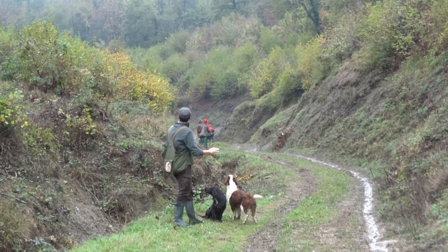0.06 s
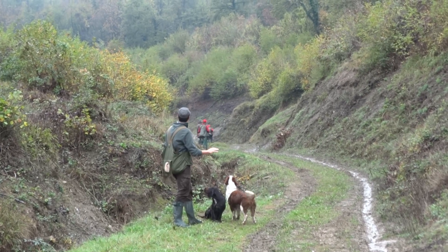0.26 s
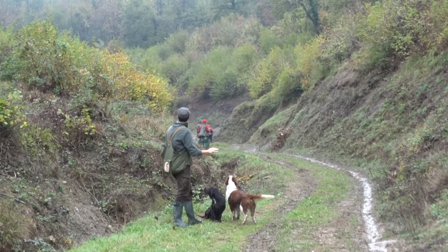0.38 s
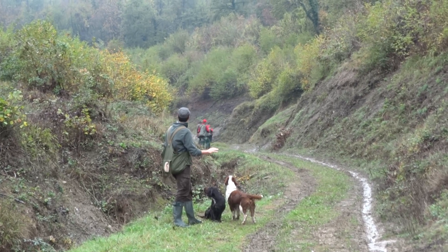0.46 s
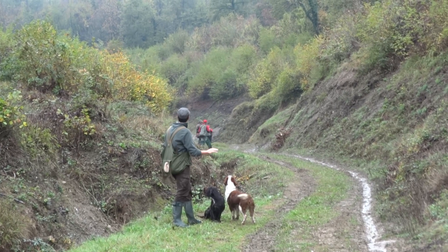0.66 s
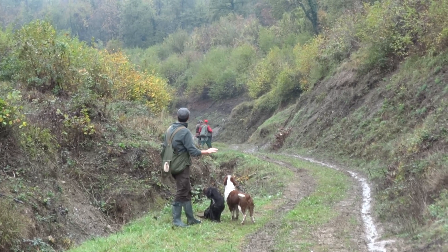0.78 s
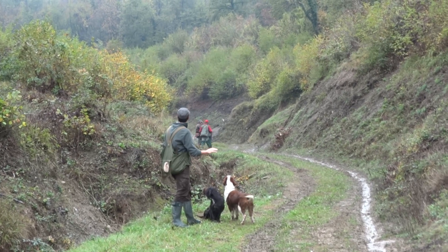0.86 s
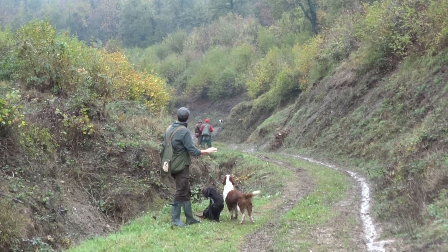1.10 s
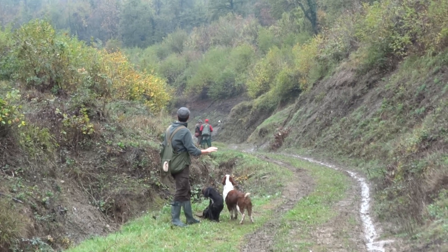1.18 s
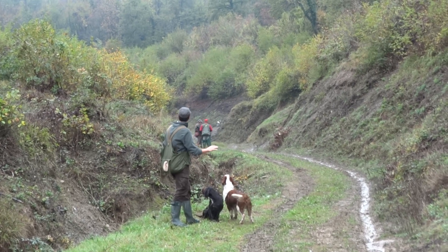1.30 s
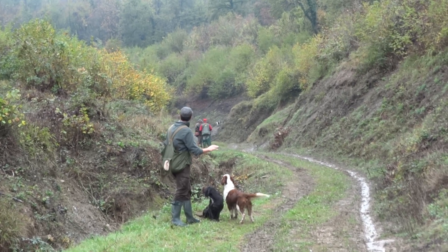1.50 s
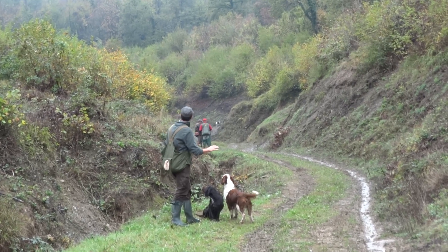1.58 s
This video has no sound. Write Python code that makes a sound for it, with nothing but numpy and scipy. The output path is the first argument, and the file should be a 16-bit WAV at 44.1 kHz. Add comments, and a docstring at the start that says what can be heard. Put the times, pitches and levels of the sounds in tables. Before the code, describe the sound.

A single gunshot some way off, its echo rolling away through a wooded valley.

```python
"""A wooded valley: one gunshot some way off, a short blast, then a louder wash of echoes from banks,
slopes and trees. The tail rolls away, darkening, with a hollow ring near 640 Hz that also hums in the
quiet background. A far animal, probably a dog, yelps just before the shot and again in the tail;
a small bird gives one thin, falling whistle."""
import sys
import numpy as np
from scipy import signal
from scipy.fft import rfft, irfft, next_fast_len
from scipy.io import wavfile
from scipy.ndimage import uniform_filter1d, minimum_filter1d, map_coordinates

SR = 44100
rng = np.random.default_rng(int(sys.argv[2]) if len(sys.argv) > 2 else 0)


def output_pcm(signal):
    """Save a mono or channel-first signal as 16-bit PCM at the path in sys.argv[1].

    Samples are clipped to [-1, 1] before scaling.
    """
    pcm = np.clip(np.atleast_2d(signal).T, -1, 1) * 32767
    wavfile.write(sys.argv[1], SR, np.round(pcm).astype(np.int16))


N = 72765

# Envelope of the long valley echo: arrival, rise and hold in seconds, level in dB.
VALLEY_ENVELOPE = (.295, .07, .018, -23.2)


def amp(db):
    """Decibels to gain."""
    return 10 ** (np.asarray(db) / 20)


def unit(x):
    """Scale to rms 1."""
    return x / np.sqrt(np.mean(x ** 2) + 1e-20)


def clock():
    """Sample times in seconds."""
    return np.arange(N) / SR


def decay(age_s, t60_s):
    """Gain falling 60 dB per t60_s."""
    return np.exp(-np.log(1000) * age_s / t60_s)


def along(points, hz):
    """Interpolate (Hz, value) points on a log frequency axis."""
    knots_hz, values = np.transpose(points)
    return np.interp(np.log(hz + 1), np.log(knots_hz + 1), values)


def wobble(rate_hz):
    """Smooth random curve, rate_hz knots a second."""
    return map_coordinates(rng.standard_normal(N), [clock() * rate_hz])


def filtered(x, response):
    """Zero-phase filter with gain response(hz)."""
    size = next_fast_len(N + SR // 2)
    return irfft(rfft(x, size) * response(np.fft.rfftfreq(size, 1 / SR)), size)[..., :N]


def coloured(x, colour, size=4096):
    """Minimum-phase filter through (Hz, dB) points."""
    cepstrum = irfft(np.log(amp(along(colour, np.fft.rfftfreq(size, 1 / SR)))))
    cepstrum[1:size // 2] *= 2
    cepstrum[size // 2 + 1:] = 0
    return signal.fftconvolve(x, irfft(np.exp(rfft(cepstrum))))[:len(x)]


def spread(pair, gain):
    """Two unrelated signals to nearly mono stereo of rms 1, shaped by gain(hz)."""
    # Stereo likeness. Each row: frequency in Hz, left-right correlation.
    correlation = [(100, .9998), (300, .993), (600, .988), (1200, .91), (2100, .91), (3200, .975),
                   (4000, .994), (5500, .988), (7500, .92), (12000, .998)]
    angle = lambda hz: np.arccos(np.clip(along(correlation, hz), -1, 1)) / 2
    mid, side = filtered(pair, lambda hz: gain(hz) * np.array([np.cos(angle(hz)), np.sin(angle(hz))]))
    return unit(np.array([mid + side, mid - side]))


def blast(start_s=.2029, spike_s=.00022, boom_rise_s=.0018):
    """Pressure spike with its suction, ground bounces and a short boom."""
    # Direct and ground paths. Each row: delay in seconds, gain in dB.
    paths = [(0, -.5), (.0017, -5.5), (.0047, -14)]
    # Blast filter. Each row: frequency in Hz, gain in dB.
    colour = [(30, -26), (120, -10), (380, -12), (660, 4), (880, -7), (1150, 0), (1900, 1), (3300, -4),
              (4800, -16), (8500, -14), (12000, -35), (16000, -35)]
    # Low thump and hollow ring. Each row: frequency in Hz, level in dB, T60 in seconds.
    modes = [(70, -41, .3), (160, -25, .09), (635, -13, .046)]
    pressure = np.zeros(N)
    for delay_s, db in paths:
        u = np.maximum(clock() - start_s - delay_s, 0) / spike_s
        pressure += amp(db) * (u > 0) * (1 - u) * np.exp(-u)
    age_s = np.maximum(clock() - start_s, 0)
    boom = sum(amp(db) * np.sin(2 * np.pi * hz * age_s) * decay(age_s, t60_s) for hz, db, t60_s in modes)
    return coloured(pressure, colour) + boom * (1 - np.exp(-age_s / boom_rise_s))


def echo(envelope, colour, t60, grain_db=1.2, clump_db=.8, frame=256):
    """Uneven cloud of reflections: swells, holds, then dies at each band's own rate."""
    start_s, rise_s, hold_s, db = envelope
    grains = rng.standard_normal((2, N)) * amp(grain_db * wobble(2500) + clump_db * wobble(90))
    wash = spread(grains, lambda hz: amp(along(colour, hz)))
    bands_hz, frames_s, spectra = signal.stft(wash, SR, nperseg=frame)
    age_s = np.maximum(frames_s - start_s - rise_s - hold_s, 0)
    spectra *= decay(age_s, along(t60, bands_hz)[:, None])
    cloud = signal.istft(spectra, SR, nperseg=frame)[1][:, :N]
    swell = np.sin(np.pi / 2 * np.clip((clock() - start_s) / rise_s, 0, 1)) ** 2
    return amp(db) * cloud * swell


def hillsides():
    """Near bank, steep slope and long valley scatter the blast back in turn."""
    # Envelopes: arrival, rise and hold in seconds, level in dB.
    bank_envelope = (.2018, .008, .019, -22.5)
    slope_envelope = (.24, .05, .043, -17.9)
    # Spectra. Each row: frequency in Hz, relative density in dB.
    bank_colour = [(25, -34), (50, -12), (130, -12), (260, -13), (450, -18), (640, -8), (880, -19),
                   (1250, -7), (1950, -1), (2500, -6), (4500, -6.5), (7500, -6.3), (9000, -9), (15500, -46)]
    slope_colour = [(25, -55), (50, -27), (170, -25), (325, -15), (660, -6), (880, -11), (1100, -3),
                    (1400, -1.5), (1820, 0), (2550, -6.5), (3000, -3.5), (4200, -8.5), (7700, -9.5),
                    (9000, -13), (15500, -50)]
    valley_colour = [(20, -55), (32, -30), (69, -20), (150, -26), (220, -14), (315, -6), (480, -1),
                     (620, -2.5), (760, -2), (880, -7), (1050, -5), (1330, -3.5), (1550, -8), (1870, -4.5),
                     (2600, -8.8), (3680, -10), (6500, -16.3), (7860, -15.7), (9400, -23), (15500, -66)]
    # Decays. Each row: frequency in Hz, T60 in seconds.
    bank_t60 = [(100, .4), (1000, .33), (8000, .42)]
    slope_t60 = [(200, .6), (2000, .5), (7000, .6), (13000, .45)]
    valley_t60 = [(60, 1.35), (250, 1.38), (600, 2), (1200, 2.55), (2500, 2.05), (5000, 1.63), (8000, 1.17),
                  (13000, .78)]
    return (echo(bank_envelope, bank_colour, bank_t60)
            + echo(slope_envelope, slope_colour, slope_t60)
            + echo(VALLEY_ENVELOPE, valley_colour, valley_t60))


def slaps(gain_db=-5.5, decay_s=.006):
    """Single faces slap the blast back as dull, smeared bursts."""
    # Reflections. Each row: arrival in seconds, relative peak in dB.
    arrivals = [(0.355, -9), (0.384, -9), (0.419, -12), (0.454, -14), (0.489, -15), (0.52, -15),
                (0.662, -18), (0.825, -23), (0.931, -24)]
    # Slap filter. Each row: frequency in Hz, relative gain in dB.
    colour = [(80, -45), (300, -14), (500, -4), (640, 1), (850, -11), (2000, -18), (5000, -32),
              (12000, -70)]
    out = np.zeros(N + SR)
    t = np.arange(SR // 10) / SR
    for start_s, db in arrivals:
        burst = coloured(rng.standard_normal(len(t)) * np.exp(-t / decay_s), colour)
        out[round(start_s * SR):][:len(t)] += amp(db + gain_db) * burst / np.abs(burst).max()
    return out[:N]


def hollow(centre_hz=642, half_width_hz=34):
    """Noise of rms 1 in a narrow resonance."""
    return spread(rng.standard_normal((2, N)), lambda hz: 1 / (1 + ((hz - centre_hz) / half_width_hz) ** 2))


def ring(rise_s=.55):
    """Hollow ring that fades in with the valley echo and lingers."""
    # Ring contour. Each row: time in seconds, level in dB before the fade-in.
    contour = [(.6, -41), (.93, -39.5), (1.12, -43), (1.23, -42), (1.35, -50), (1.5, -55), (1.65, -60)]
    times_s, db = np.transpose(contour)
    fade_in = np.clip((clock() - VALLEY_ENVELOPE[0]) / rise_s, 0, 1)
    return amp(np.interp(clock(), times_s, db)) * fade_in * hollow()


def yelps(arch=.06, jitter=.05, attack_s=.006):
    """Short, high, far calls: the pitch arches, and its jitter makes them hoarse."""
    # Each row: start and length in seconds, top pitch in Hz, level in dB, roughness from 0 to 1.
    calls = [(.157, .12, 920, -56, .2), (1.179, .11, 890, -45, .55)]
    # Relative harmonic levels in dB, fundamental first.
    harmonics_db = [-15, -2, 0, -5, -12, -15, -22]
    out = np.zeros(N)
    for start_s, length_s, top_hz, db, roughness in calls:
        progress = np.clip((clock() - start_s) / length_s, 0, 1)
        pitch_hz = top_hz * (1 + arch * (np.sin(np.pi * progress) - 1) + jitter * roughness * wobble(600))
        phase = 2 * np.pi * np.cumsum(pitch_hz) / SR
        voice = unit(sum(amp(level) * np.sin(k * phase) for k, level in enumerate(harmonics_db, 1)))
        envelope = np.minimum(progress * length_s / attack_s, 1) * np.sqrt(1 - progress)
        out += amp(db) * voice * envelope
    return among_trees(out, wet_db=2, t60_s=1.25)


def bird(waver=.006, lower_voice_db=-13):
    """Thin, falling, two-voiced whistle."""
    # Each row: time in seconds, upper and lower pitch in Hz, upper voice level in dB.
    whistle = [(1.34, 8600, 7400, -80), (1.353, 8440, 7320, -68), (1.368, 8030, 7240, -59),
               (1.39, 7880, 7270, -55), (1.415, 7760, 7230, -53.5), (1.435, 7950, 7200, -59),
               (1.455, 7780, 7050, -63), (1.53, 7880, 7150, -72), (1.6, 7850, 7100, -82)]
    times_s, upper_hz, lower_hz, db = np.transpose(whistle)
    t = clock()

    def voice(hz):
        pitch_hz = np.interp(t, times_s, hz) * (1 + waver * wobble(150))
        return np.sqrt(2) * np.sin(2 * np.pi * np.cumsum(pitch_hz) / SR)

    envelope = amp(np.interp(t, times_s, db)) * (t > times_s[0]) * (t < times_s[-1])
    call = envelope * (voice(upper_hz) + amp(lower_voice_db) * voice(lower_hz))
    return among_trees(call, wet_db=-8, t60_s=.7)


def among_trees(call, wet_db, t60_s):
    """A call plus its diffuse echo from the woods."""
    tail = spread(rng.standard_normal((2, N)), np.ones_like) * decay(clock(), t60_s)
    tail /= np.linalg.norm(tail[0])
    return call + amp(wet_db) * signal.fftconvolve(call[None], tail, axes=1)[:, :N]


def background(hiss_db=-56.3, hum_db=-57.5):
    """Faint hiss and a hollow hum."""
    # Hiss spectrum. Each row: frequency in Hz, relative density in dB.
    colour = [(20, -50), (35, -32), (80, -24), (150, -31), (300, -28), (430, -22), (530, -7), (680, -3),
              (800, -18), (900, -20), (1130, -13), (1500, -21), (1880, -14), (2600, -24), (3250, -18),
              (3900, -27), (5200, -28.5), (8300, -28), (11000, -46), (15500, -54)]
    hiss = spread(rng.standard_normal((2, N)), lambda hz: amp(along(colour, hz)))
    return amp(hiss_db) * hiss + amp(hum_db) * hollow()


def scene():
    """The shot and its echoes over the quiet valley and its animals."""
    return blast() + hillsides() + slaps() + ring() + background() + bird() + yelps()


def record(dry):
    """Peak limiter, then a brick-wall low-pass."""
    ceiling, window_s, cutoff_hz = .41, .002, 15750
    size = round(window_s * SR) | 1
    needed_gain = ceiling / np.maximum(np.abs(dry).max(axis=0), ceiling)
    gain = uniform_filter1d(minimum_filter1d(needed_gain, size), size)
    return filtered(dry * gain, lambda hz: hz < cutoff_hz)


dry = scene()
out = record(dry)
output_pcm(out)
```